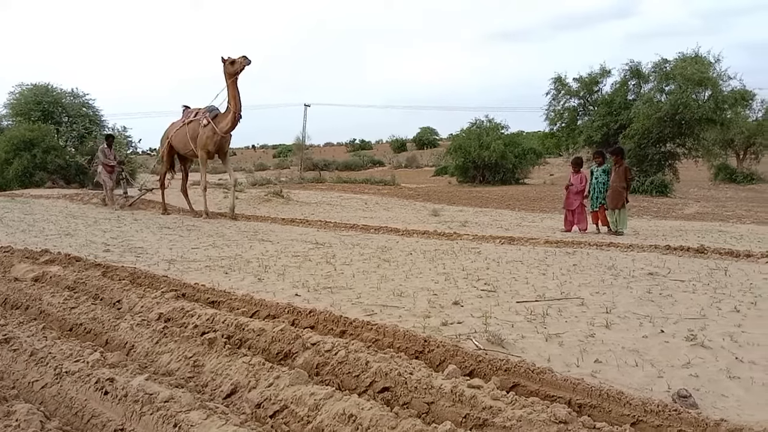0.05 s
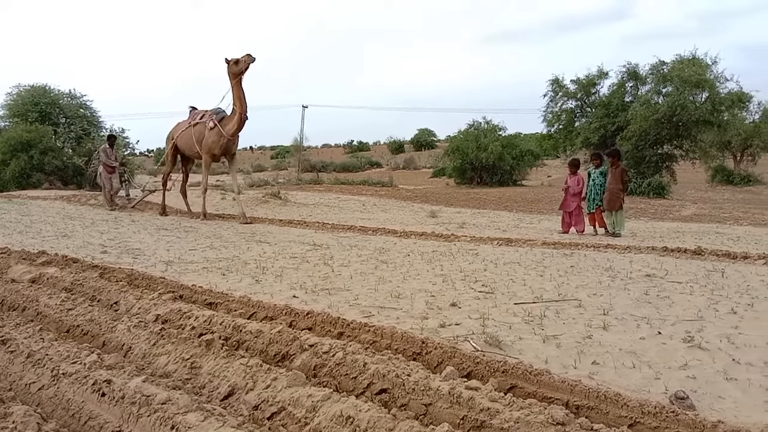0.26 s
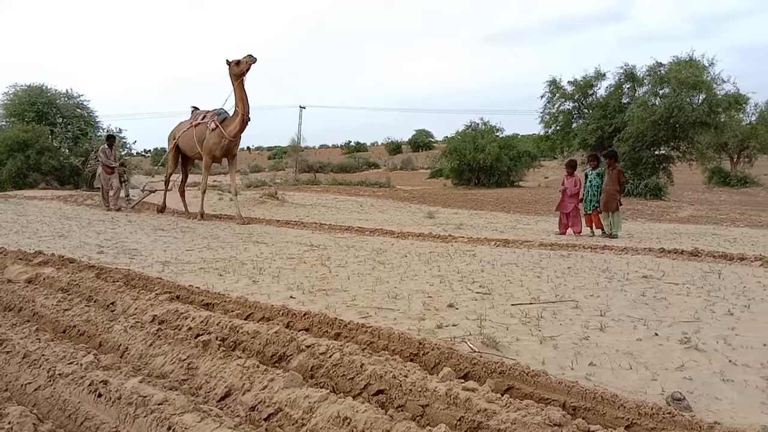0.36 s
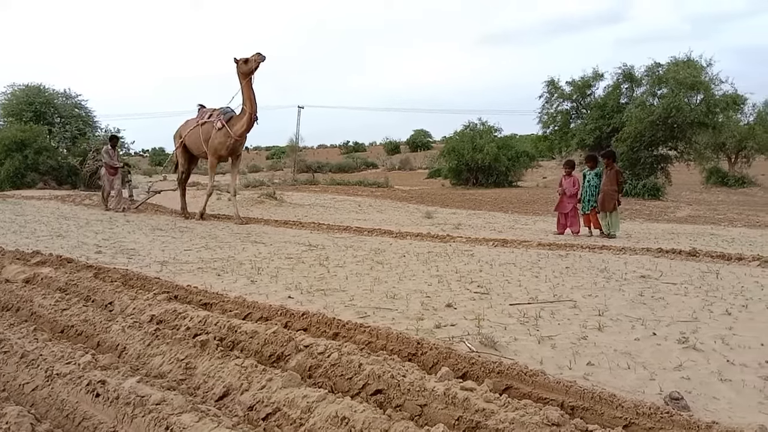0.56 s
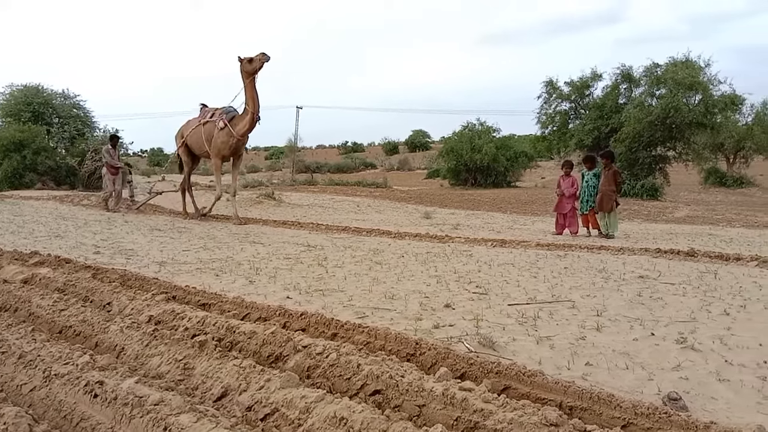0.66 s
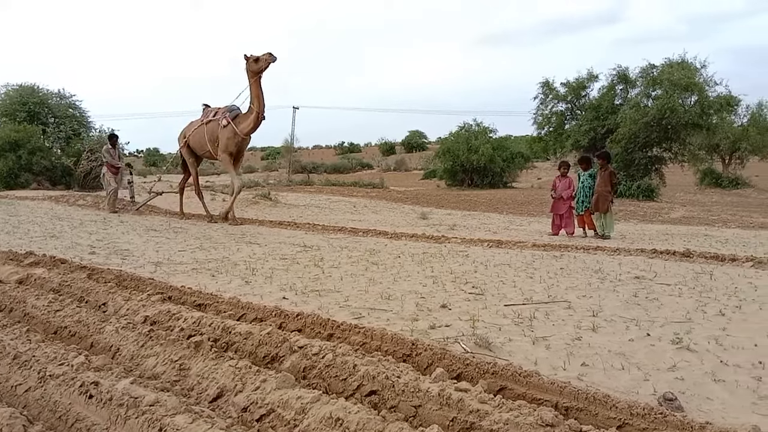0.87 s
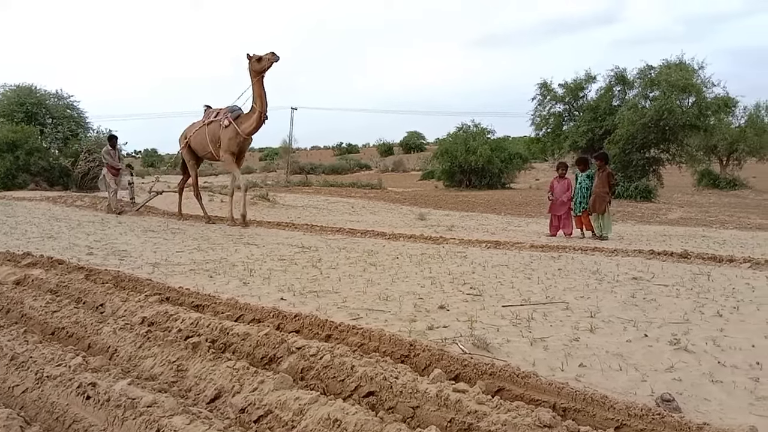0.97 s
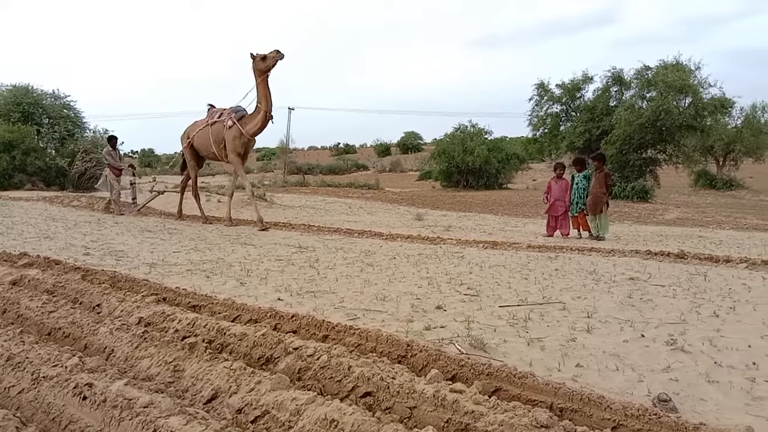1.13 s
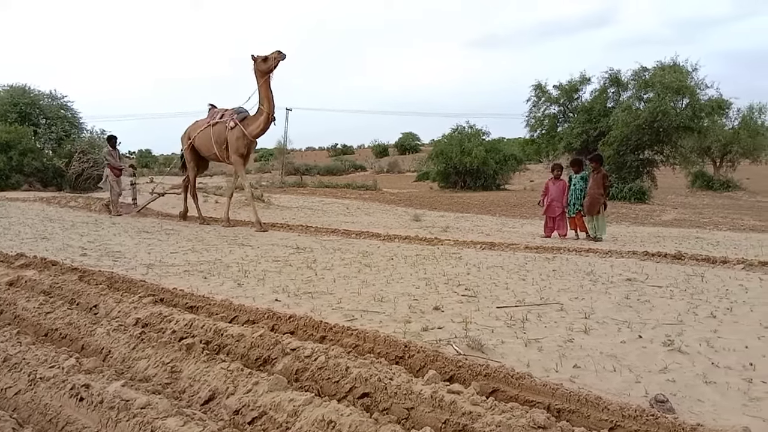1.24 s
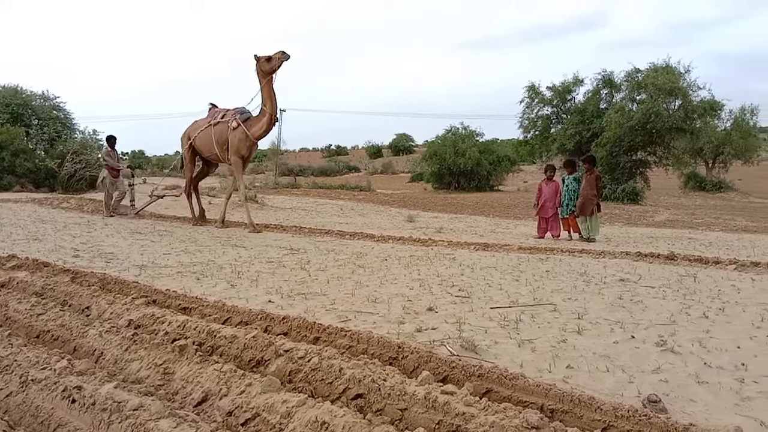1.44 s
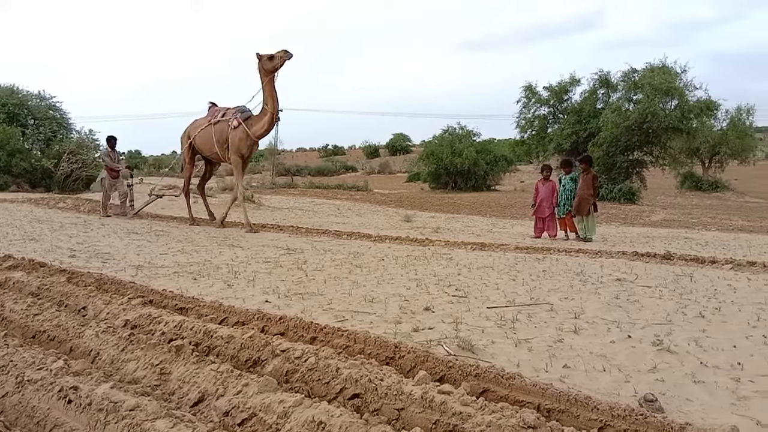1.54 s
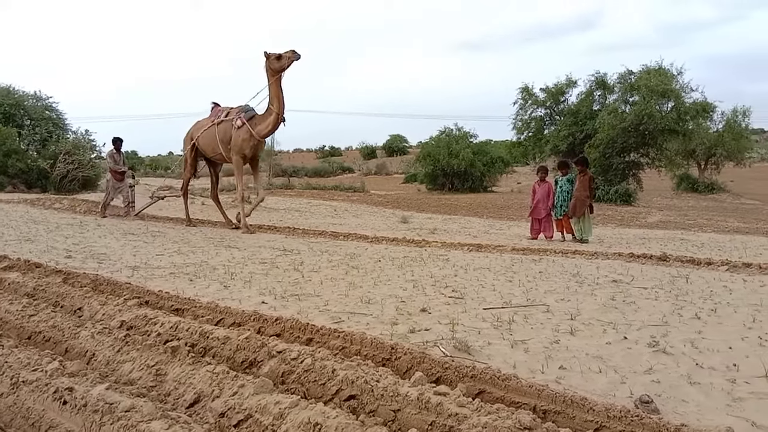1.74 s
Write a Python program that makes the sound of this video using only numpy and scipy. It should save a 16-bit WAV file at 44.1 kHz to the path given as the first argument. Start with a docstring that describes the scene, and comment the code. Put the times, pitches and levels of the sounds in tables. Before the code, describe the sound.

Wind buffets the microphone in an open field, then dies to a low flutter. Small birds chirp faintly over a soft, dry scrape, probably a plough in the soil. A small, sharp click comes near the end.

```python
"""An open sandy field. A gust buffets the microphone, then dies to a low flutter.
Behind it are a narrow band of air noise, a dry scrape (probably a plough in the soil), gritty rustles
and ticks, and small birds whistling chirps and peeps, the farther ones blurred by the bushes.
Close to the microphone, one pressure pulse makes a dull pop near the start, over a faint hum,
and a small hard part snaps with a sharp click near the end."""
import sys
import numpy as np
from scipy import signal
from scipy.fft import rfft, irfft
from scipy.io import wavfile
from scipy.ndimage import uniform_filter1d

SR = 44100
rng = np.random.default_rng(int(sys.argv[2]) if len(sys.argv) > 2 else 0)


def to_wav(sig):
    """Store sig (one row per channel, or 1-D mono) as 16-bit WAV at the path in sys.argv[1].

    Samples outside -1..1 are clipped; the rate is SR.
    """
    pcm = np.clip(np.atleast_2d(sig), -1, 1) * 32767
    pcm = np.round(pcm).astype(np.int16)
    wavfile.write(sys.argv[1], SR, pcm.T)  # frames by channels


N = 79380
TIME = np.arange(N) / SR
BUSHES_T60_S = 0.3  # decay of birdsong scattered off the bushes


def from_db(db):
    """Decibels to gain."""
    return 10 ** (np.asarray(db) / 20)


def rms_one(x):
    """Scale to unit rms."""
    return x / np.sqrt(np.mean(x ** 2) + 1e-20)


def level(rows):
    """Gain over time from rows of seconds and dB."""
    return from_db(np.interp(TIME, *np.transpose(rows)))


def progress(start, length):
    """Runs from 0 to 1 through an event."""
    return np.clip((TIME - start) / length, 0, 1)


def swell(middle, length, sharpness=1):
    """A rounded rise and fall of height 1."""
    return np.abs(np.sin(np.pi * progress(middle - length / 2, length))) ** sharpness


def colour(x, spectrum):
    """Shape a signal by rows of Hz and relative dB; rms 1."""
    hz, db = np.transpose(spectrum)
    bin_hz = np.maximum(np.arange(N // 2 + 1) * SR / N, 1)
    gain = from_db(np.interp(np.log(bin_hz), np.log(hz), db))
    return rms_one(irfft(rfft(x) * gain, N))


def noise(spectrum):
    """Steady coloured noise."""
    return colour(rng.standard_normal(N), spectrum)


def wavering(spectrum, bands=9, depth_db=5, drift_s=0.045):
    """Coloured noise whose bands swell and fade independently."""
    bins, size = rfft(noise(spectrum)), int(drift_s * SR)
    bin_hz = np.arange(len(bins)) * SR / N
    place = np.interp(np.log(bin_hz + 1), np.log([560, 6500]), [0, bands - 1])
    out = np.zeros(N)
    for k in range(bands):
        drift = uniform_filter1d(rng.standard_normal(N), size, mode="wrap")
        drift = uniform_filter1d(drift, size, mode="wrap")
        band = irfft(bins * np.maximum(1 - np.abs(place - k), 0), N)
        out += from_db(depth_db * rms_one(drift - drift.mean())) * band
    return rms_one(out)


def turbulence(spectrum, even_s=0.034):
    """Coloured noise of even short-term strength."""
    x = noise(spectrum)
    power = uniform_filter1d(np.abs(signal.hilbert(x)) ** 2, int(even_s * SR))
    return rms_one(x / np.sqrt(power + 1e-9))


def whistle(hz, waver_hz=25):
    """A bird's pure tone, slightly unsteady; rms 1."""
    waver = waver_hz * rms_one(uniform_filter1d(rng.standard_normal(N), size=90))
    return np.sqrt(2) * np.sin(2 * np.pi * np.cumsum(hz + waver) / SR)


def ring(hits, hz, t60):
    """A unit hit sets a sine of height 1 ringing."""
    r, w = from_db(-60 / (t60 * SR)), 2 * np.pi * hz / SR
    return signal.lfilter([0, np.sin(w)], [1, -2 * r * np.cos(w), r * r], hits + 1e-18)


def scatter(x, tail_db, t60):
    """Add a diffuse tail."""
    tail = rng.standard_normal(N) * np.exp(-np.log(1000) * TIME / t60)
    return x + from_db(tail_db) * signal.fftconvolve(x, tail / np.linalg.norm(tail))[:N]


def air():
    """The steady hiss of open air, all around."""
    # Each row: frequency in Hz, relative level in dB.
    spectrum = [(100,-9),(420,-5),(595,3),(850,-14),(1080,-7.5),(1700,-11.5),(2200,-8),(3300,-9.5),(4200,-14.5),(5400,-10),(6400,-9),(7200,-29.5),(8800,-25),(10200,-20.5),(11200,-21.5),(15500,-28.5)]
    return from_db(-81.5) * noise(spectrum)


def air_band():
    """A narrow band of air noise, coloured by the microphone, with a lower, hollow band that wavers."""
    # The two bands' colours. Each row: frequency in Hz, relative level in dB.
    narrow_colour = [(900,-47.5),(1130,-32.5),(1240,-3.5),(1340,5.5),(1460,4.5),(1590,-17),(1800,-23),(2300,-58),(5000,-82.5)]
    hollow_colour = [(300,-30.5),(430,-19),(520,-8.5),(595,5),(690,-7.5),(850,3),(960,-6),(1080,-25),(2000,-62)]
    # Their rise and fall. Each row: time in seconds, level in dB.
    narrow_level = [(0,-68),(.13,-64),(.28,-54.5),(.45,-60.5),(.56,-68),(.65,-62),(.86,-68.5),(.95,-64),(1.28,-66),(1.45,-60.5),(1.65,-60),(1.8,-65)]
    hollow_level = [(0,-72),(.13,-69),(.45,-67),(.51,-76),(.69,-67.5),(.9,-74),(1.02,-79.5),(1.1,-76),(1.17,-79.5),(1.25,-77),(1.45,-74.5),(1.54,-72.5),(1.7,-77),(1.8,-79.5)]
    return level(narrow_level) * noise(narrow_colour) + level(hollow_level) * wavering(hollow_colour)


def scrape(ring_hz=3368, width_hz=150):
    """In the background, probably a plough in the soil: a swelling scrape that rings in one band."""
    # Each row: frequency in Hz, relative level in dB.
    spectrum = [(700,-24.5),(1080,-12.5),(1700,8.5),(2100,-2),(2770,8.5),(3050,-0.5),(3400,-3),(3600,-6),(3800,-24),(4450,-25.5),(5000,-1),(5800,-23.5),(6450,-11.5),(7100,-32),(12000,-37)]
    # The scrape and its ring. Each row: time in seconds, level in dB.
    scrape_level = [(0,-83.5),(.1,-74),(.2,-86),(.62,-88),(.86,-77),(1.17,-74.5),(1.36,-68.5),(1.6,-70),(1.7,-77.5),(1.8,-98)]
    ring_level = [(0,-80.5),(.12,-74.5),(.25,-88.5),(.62,-91.5),(.86,-77.5),(1.3,-74),(1.58,-79),(1.7,-96)]
    edges_hz = [ring_hz - width_hz / 2, ring_hz + width_hz / 2]
    band = signal.butter(2, edges_hz, "band", fs=SR, output="sos")
    ringing = rms_one(signal.sosfilt(band, rng.standard_normal(N)))
    return level(scrape_level) * wavering(spectrum) + level(ring_level) * ringing


def wind(halfway_db=-29):
    """Wind rumbles on the microphone; hard buffets shift the rumble upward and add smaller eddies."""
    # Wind pressure and eddy strength. Each row: time in seconds, relative level in dB.
    pressure_level = [(0.0, -65), (0.084, -70), (0.13, -30.5), (0.154, -44), (0.22, -35.5), (0.27, -17),
                      (0.284, -22.5), (0.304, -26.5), (0.334, -20.5), (0.39, -21), (0.43, -39.5),
                      (0.456, -35.5), (0.48, -52), (0.516, -38.5), (0.546, -50.5), (0.636, -36),
                      (0.666, -42.5), (0.736, -43), (0.816, -70.5), (0.852, -51), (0.972, -65.5),
                      (1.138, -50.5), (1.162, -59.5), (1.328, -56), (1.478, -71), (1.768, -63.5),
                      (1.8, -80)]
    eddy_level = [(.1,-69),(.128,-59),(.165,-67),(.192,-27.5),(.215,-50),(.25,-30.5),(.283,-22),(.305,-33),(.335,-28),(.39,-36.5),(.43,-42.5),(.48,-75),(.54,-74),(.575,-49),(.62,-62),(.68,-68),(.8,-90),(1.1,-77.5),(1.16,-59),(1.22,-82),(1.8,-81)]
    # Light wind, hard gust and eddies. Each row: frequency in Hz, relative level in dB.
    light_colour = [(15,-20.5),(40,-15),(68,3.5),(105,2),(145,-5.5),(200,-15),(280,-38),(370,-51),(600,-67.5),(2000,-120)]
    gust_colour = [(15,-35.5),(45,-18),(72,-2.5),(113,4),(145,-0.5),(200,-10.5),(290,-23),(400,-31),(600,-61),(2000,-120)]
    eddy_colour = [(80,-31.5),(170,7),(270,9),(390,-6),(520,-13.5),(700,-26),(1000,-39.5),(2000,-63.5),(6000,-110)]
    pressure = level(pressure_level)
    hard = pressure / (pressure + from_db(halfway_db))  # the gust colour's share of the power
    rumble = np.sqrt(1 - hard) * turbulence(light_colour) + np.sqrt(hard) * turbulence(gust_colour)
    eddies = level(eddy_level) * turbulence(eddy_colour)
    return from_db(-0.5) * pressure * rumble + from_db(-5) * eddies


def hum(hz=301, db=-64.5):
    """A faint low tone that soon stops."""
    fade = 1 - progress(start=0.075, length=0.0058)
    return from_db(db) * np.sqrt(2) * np.sin(2 * np.pi * hz * TIME) * fade


def ticks(faint_per_s=74, faint_db=-70, t60=0.018):
    """Tiny dry crunches that die at once: a few clear ones among faint ones at random."""
    # The clear ticks. Each row: start in seconds, level in dB.
    clear_ticks = [(0.158,-57.5),(.305,-52.5),(.322,-63),(0.397,-60.5),(0.724,-52),(0.913,-55),(1.018,-60),(1.138,-56),(1.39,-59.5),(1.471,-58),(1.516,-59)]
    # Each row: frequency in Hz, relative level in dB.
    spectrum = [(2500,-23.5),(4300,-12),(5000,-0.5),(5800,-9.5),(6450,-0.5),(7200,-29.5),(8800,-20),(10100,1),(11000,-15),(12300,-10.5),(14500,-30.5)]
    hits = (rng.random(N) < faint_per_s / SR) * from_db(faint_db + rng.normal(0, 2.5, N))
    for start, db in clear_ticks:
        hits[int(start * SR)] += from_db(db)
    dying = signal.lfilter([1], [1, -from_db(-60 / (t60 * SR))], hits + 1e-18)
    crunch = noise(spectrum)
    return dying * crunch / np.abs(crunch).max()


def birds(arch_hz=252.4):
    """Out in the field, one bird's high chirps fall ever faster; later a second peeps in short arches."""
    # Each row: start in seconds, length in seconds, level in dB, first and last pitch in Hz.
    chirps = [(0.044,0.054,-59.5,6100,5370),(0.228,.06,-50.5,5935,5300),(0.421,0.053,-57.5,5930,5410),(0.742,0.057,-68.5,5640,5400),(0.925,0.038,-65,5700,5440),(0.962,0.039,-64.5,5710,5470),(0.992,0.05,-65.5,5750,5440),(1.044,0.046,-75,5580,5430),(1.761,0.03,-77.5,5350,5340)]
    # Each row: start in seconds, length in seconds, level in dB, top pitch in Hz.
    peeps = [(1.391,0.016,-65.5,3230),(1.488,0.023,-64,3200),(1.583,.028,-64.5,3060),(1.684,0.028,-78.5,2910)]
    song = np.zeros(N)
    for start, length, db, first, last in chirps:
        u = progress(start, length)
        rise_fall = np.interp(u, [0, 0.7, 1], [0, 1, 0])  # loudest late in the chirp
        envelope = np.sin(np.pi / 2 * rise_fall) ** 1.9
        song += from_db(db) * envelope * whistle(first + (last - first) * u ** 1.2)
    for start, length, db, top in peeps:
        u = progress(start, length)
        song += from_db(db) * np.sin(np.pi * u) * whistle(top - arch_hz * (2 * u - 1) ** 2)
    return scatter(song, tail_db=-19, t60=BUSHES_T60_S)


def pop(at_s=0.0624, peak_db=-25):
    """One dull pressure pulse close to the microphone, with no ring."""
    # Each row: frequency in Hz, relative level in dB.
    spectrum = [(60,-3),(300,-8),(800,-4),(1300,0),(2000,-9.5),(2800,-13.5),(3400,-26),(3900,-33),(4700,-39),(5200,-14.5),(6300,-22),(7300,-53),(9000,-52),(10200,-39),(12500,-56),(15000,-62)]
    pulse = colour(signal.unit_impulse(N, int(at_s * SR)), spectrum)
    return from_db(peak_db) * pulse / np.abs(pulse).max()


def rustles(grains_per_s=440):
    """Short swells of dense dry grains."""
    # Each row: middle in seconds, length in seconds, level in dB.
    bursts = [(.3,0.23,-79.5),(.7,0.17,-78),(.838,.1,-67.5),(.935,0.05,-72.5),(1.472,0.041,-76)]
    # The grit's colour. Each row: frequency in Hz, relative level in dB.
    grit = [(3000,-21.5),(4400,-6.5),(5000,9),(5600,-6.5),(6450,8.5),(7200,-34),(8800,-15.5),(10100,-5),(11200,-9.5),(12300,-7),(15000,-29.5)]
    sizes = from_db(np.minimum(rng.exponential(1, N), 4)) * rng.choice([-1, 1], N)
    grains = sizes * (rng.random(N) < grains_per_s / SR)
    envelope = sum(from_db(db) * swell(middle, length, sharpness=1.3) for middle, length, db in bursts)
    return envelope * colour(grains, grit)


def thumps(width_s=0.00083):
    """The hardest eddies hit the microphone's port, each with one push and pull of pressure."""
    # Each row: time in seconds, relative level in dB.
    strikes = [(.285,-12.5),(.336,-13.5)]
    out = np.zeros(N)
    for at_s, db in strikes:
        u = (TIME - at_s) / width_s
        out += from_db(db) * u * np.exp(-0.5 * u ** 2)
    return out


def twitter(swing_hz=148.4, turn_s=0.0031):
    """Far birds slide about in pitch and reach the microphone mostly as scatter from the bushes."""
    # Each row: middle in seconds, length in seconds, level in dB, pitch in Hz.
    calls = [(0.725,0.39,-73.5,5483),(1.013,0.25,-78,5040),(1.3,.1,-71,5010),(1.303,0.16,-79,5430)]
    out, size = np.zeros(N), int(turn_s * SR)
    for middle, length, db, hz in calls:
        slide = rms_one(uniform_filter1d(uniform_filter1d(rng.standard_normal(N), size), size))
        voice = scatter(whistle(hz + swing_hz * slide), tail_db=11, t60=BUSHES_T60_S)
        out += from_db(db) * swell(middle, length) * rms_one(voice)
    return out


def click(spread_db=0.5):
    """A small hard part snaps near the microphone: contacts within milliseconds excite short modes."""
    # Each row: time in seconds, relative strength in dB.
    contacts = [(1.6180,-28),(1.6195,-58),(1.6184,-37),(1.6200,-39),(1.6211,-47.5)]
    # Each row: frequency in Hz, relative level in dB, seconds to die away by 60 dB.
    modes = [(2720,-7.5,0.01),(3420,-7.5,0.0091),(3970,-15.5,0.013),(5140,-1,0.011),(5800,0,0.014),(6310,-7.5,0.0086),(7100,-9.5,0.0036),(9760,-14.5,0.0048),(11420,-13,0.0052),(12200,-13,0.0077),(15000,-17,0.0039)]
    times, contact_db = np.transpose(contacts)
    body = np.zeros(N)
    for k, (hz, db, t60) in enumerate(modes):
        uneven_db = spread_db * rng.standard_normal(len(times))  # no two contacts strike alike
        hits = np.zeros(N)
        hits[(times * SR).astype(int)] = from_db(db + contact_db + uneven_db)
        body += (-1) ** k * ring(hits, hz, t60)
    return scatter(body, tail_db=-22, t60=0.1)


def scene():
    """The field from one microphone, standing in the wind."""
    behind = air() + air_band() + scrape() + hum() + ticks() + birds() + rustles() + twitter()
    close = wind() + pop() + thumps() + click()
    return (behind + close)[None]


def record(dry, cutoff_hz=15650):
    """The recorder cuts the top treble steeply."""
    return signal.sosfilt(signal.ellip(10, 0.1, 80, cutoff_hz, fs=SR, output="sos"), dry)


dry = scene()
out = record(dry)
to_wav(out)
```